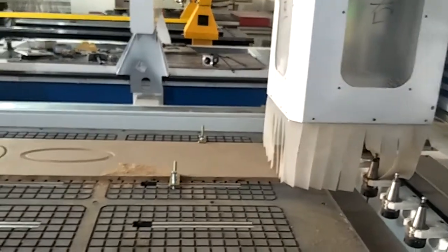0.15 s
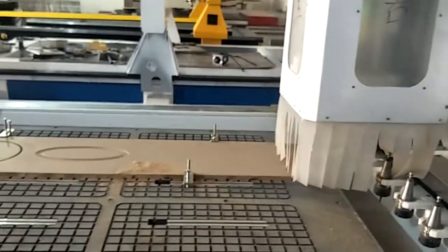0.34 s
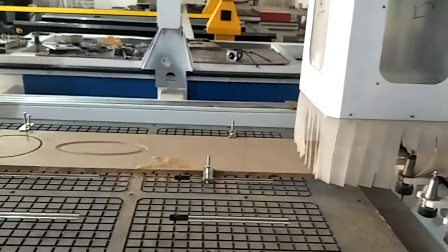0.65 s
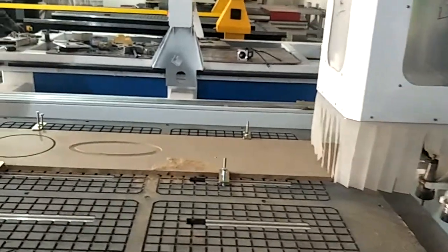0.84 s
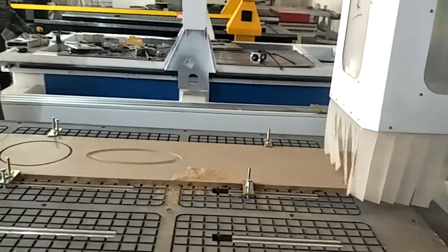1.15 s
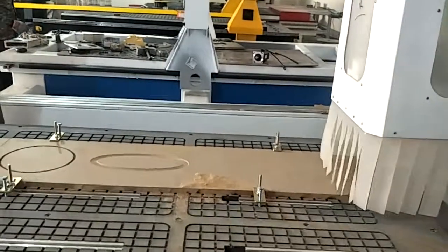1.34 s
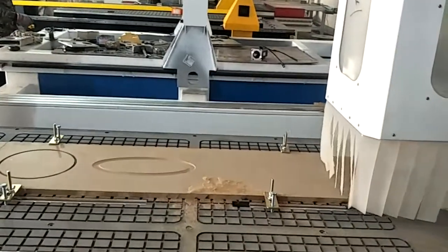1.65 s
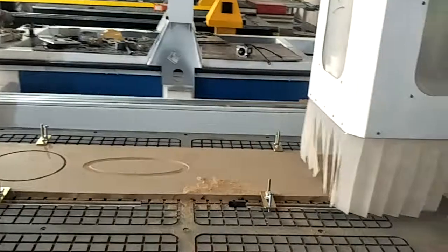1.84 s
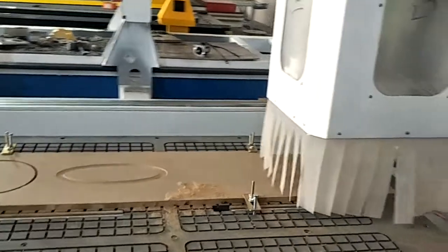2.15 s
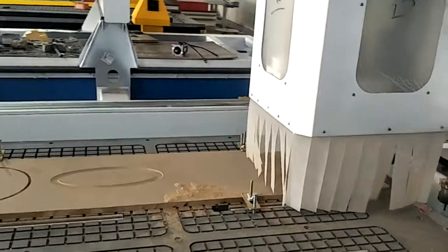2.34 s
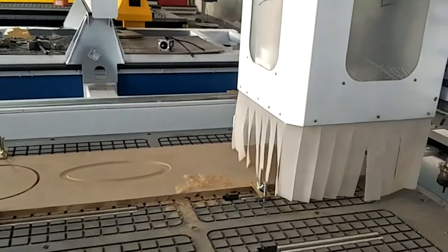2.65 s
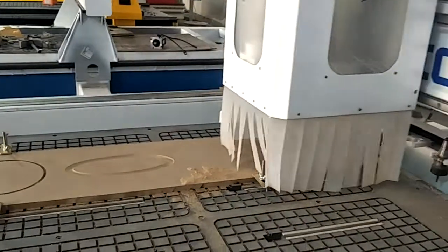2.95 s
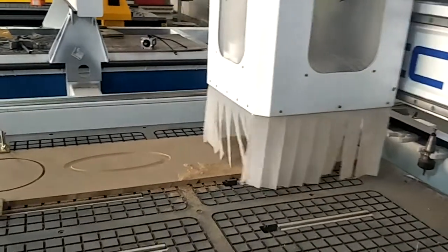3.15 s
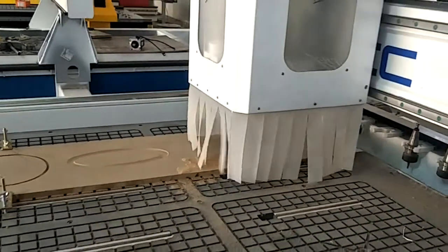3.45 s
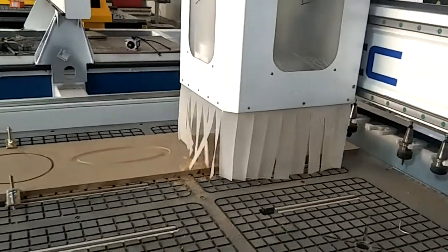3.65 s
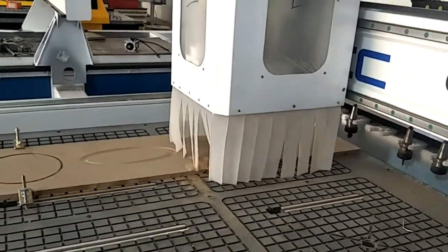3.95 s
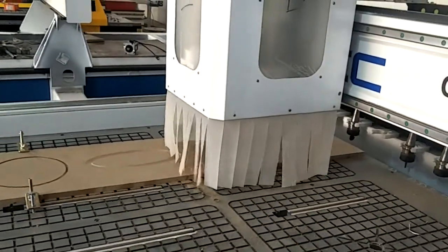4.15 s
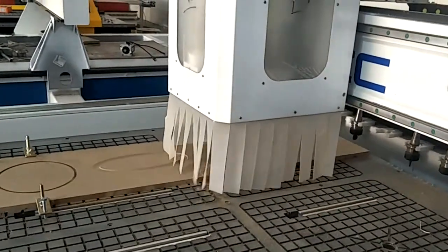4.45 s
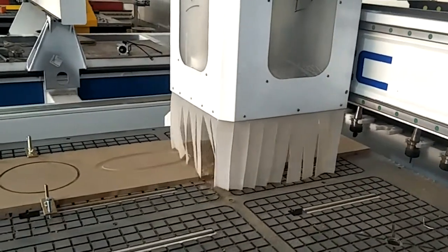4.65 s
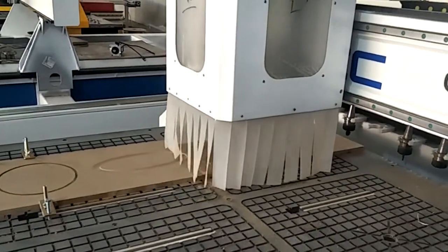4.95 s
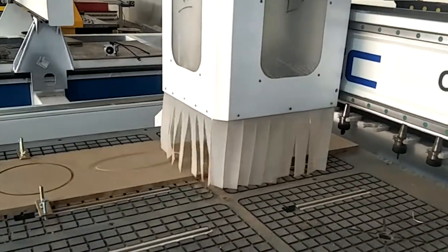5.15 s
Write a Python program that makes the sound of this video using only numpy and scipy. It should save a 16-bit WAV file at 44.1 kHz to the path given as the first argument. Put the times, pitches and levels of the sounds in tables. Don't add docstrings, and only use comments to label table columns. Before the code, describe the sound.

A router spindle runs up in a workshop, low hum and piercing whine climbing together over air rush, with a clanking double knock midway.

```python
import sys
import numpy as np
from scipy import signal
from scipy.fft import rfft, irfft, next_fast_len
from scipy.io import wavfile
from scipy.ndimage import uniform_filter1d, map_coordinates

SR = 44100
rng = np.random.default_rng(int(sys.argv[2]) if len(sys.argv) > 2 else 0)


def persist_wave(psi):
    counts = np.round(np.clip(psi, -1, 1) * 32767).astype(np.int16)
    wavfile.write(sys.argv[1], SR, np.atleast_2d(counts).T)


def magnitude_from_level(level_db):
    exponent = np.asarray(level_db, float) / 20
    return 10 ** exponent


N = 233465
T = np.arange(N) / SR


def unit(x):
    return x / np.sqrt(np.mean(x ** 2) + 1e-20)


def along(points, hz):
    f, v = np.transpose(points)
    return np.interp(np.log(hz + 1), np.log(f + 1), v)


def curves(rows):
    s, *columns = np.transpose(rows)
    return [np.interp(T, s, column) for column in columns]


def wobble(rate):
    return map_coordinates(rng.standard_normal(int(N * rate / SR) + 4), [T * rate])


def gate(start, end, fade):
    return np.clip((T - start) / fade + .5, 0, 1) * np.clip((end - T) / fade + .5, 0, 1)


def since(s):
    return np.maximum(T - s, 0)


def lean(db):
    return db * np.array([[.5], [-.5]])


def tone(hz, flutter_db, rate, turn=0):
    phase = 2 * np.pi * np.cumsum(hz) / SR
    ports = []
    for side in (0, 1):
        level = np.sqrt(2) * magnitude_from_level(flutter_db * wobble(rate))
        ports.append(level * np.sin(phase + side * turn + flutter_db / 4 * wobble(rate)))
    return np.array(ports)


def filtered(x, response):
    m = next_fast_len(N + SR // 2)
    return irfft(rfft(x, m) * response(np.fft.rfftfreq(m, 1 / SR)), m)[..., :N]


def modes(table):
    def response(f):
        total = 0
        for k, (centre, width, db) in enumerate(table):
            total = total + (-1) ** k * magnitude_from_level(db) * 1j * f * width / (centre * centre - f * f + 1j * f * width)
        return total
    return response


def crossing(table, hz):
    power = sum(magnitude_from_level(2 * db) / (1 + (2 * (hz - c) / w) ** 2) ** 2 for c, w, db in table)
    return 10 * np.log10(power)


# t/s, f/Hz
SHAFT_SPEED = [(0.0, 141), (0.25, 150.2), (0.5, 163.2), (0.75, 171.2), (1.0, 181.6), (1.25, 189.7),
               (1.5, 196.7), (1.75, 203.6), (2.0, 209.5), (2.5, 218.8), (3.0, 228.56), (3.5, 238.5),
               (4.0, 249.5), (4.5, 260.5), (5.0, 275.8), (5.29, 282.5)]


def shaft_speed():
    return curves(SHAFT_SPEED)[0]


def ripple_rate():
    set_hz, set_s, ramp_hz_per_s = 1400, 2.52, 232.5
    return set_hz - ramp_hz_per_s * np.maximum(set_s - T, 0)


# f/Hz, width/Hz, level/dB
BED_MODES = [(143.6, 27, -29), (164.5, 7.3, -20), (174.3, 13, -11), (185.2, 9, -10.5), (199.5, 3, -13),
             (207.14, 11.6, -11.5), (225.3, 6.5, -13), (232.2, 10, -20.5), (238.25, 7.4, -17),
             (253.9, 8, -18), (271.1, 10.2, -18), (281.8, 6.5, -22.5)]


def shaft_hum(shaft):
    throb = 2.4 * wobble(11)
    return magnitude_from_level(crossing(BED_MODES, shaft) + throb + lean(1)) * tone(shaft, flutter_db=.5, rate=20)


OVERTONE_LEVELS = [-41, -41, -39.5]
# f/Hz, width/Hz, level/dB
FRAME_MODES = [(347, 22, 4.5), (413, 10.7, 4.5), (536, 82, -0.5), (674.7, 42, 3), (812.6, 29, 4),
               (917.4, 26, 4)]


def frame_rattle(shaft):
    orders = sum(magnitude_from_level(db) * tone(order * shaft, flutter_db=4, rate=22)
                 for order, db in enumerate(OVERTONE_LEVELS, 2))
    return filtered(orders, lambda f: modes(FRAME_MODES)(f) ** 2)


# from t/s, until t/s, gain level/dB
LOAD_CHANGES = [(-.1, .2, 6), (.5, .9, 3), (1.4, 2.6, 3), (2.9, 3.8, -5), (3.85, 4.55, 2)]


def ripple_hum(ripple):
    level_db = -38 + sum(db * gate(start, end, fade=.1) for start, end, db in LOAD_CHANGES)
    return magnitude_from_level(level_db + [[.8], [-1.5]]) * tone(ripple, flutter_db=2.5, rate=9, turn=1.01)


# f/Hz, width/Hz, level/dB
HOUSING_MODES = [(1877, 80, -39.5), (2020, 70, -34), (2123, 39, -27), (2258, 39, -32.5), (2370, 130, -42.5),
                 (2620, 360, -40.5)]


def bearing(shaft):
    pass_hz = 9.3 * shaft
    return magnitude_from_level(crossing(HOUSING_MODES, pass_hz) + 2.0) * tone(pass_hz, flutter_db=0.0, rate=14)


# t/s, level/dB, left-right level/dB
WHINE_LEVELS = [(0, -21.5, -8), (.08, -25.5, 10), (.2, -28, -5), (.35, -22, 9.5), (.7, -25.5, -12),
                (1.1, -26, -5), (1.6, -31.5, -9), (1.8, -30, -5.5), (2.15, -26.5, -15.5), (2.5, -27.5, -12),
                (2.97, -24, -11.5), (3.15, -34.5, -8), (3.6, -31.5, -13.5), (4.0, -26.5, -6.5),
                (4.3, -24, -3.5), (4.65, -23.5, -11), (4.9, -30.5, -2), (5.2, -25, -1.5)]
# f/Hz, level/dB
CASING_RADIATION = [(5300, -33.5), (6200, -31), (6900, -39.5), (7500, -46), (8350, -35.5), (9000, -43.5),
                    (9700, -43), (10300, -38.5)]


def slot_whine(shaft, ripple):
    slot_hz = 32 * shaft
    upper_hz = slot_hz + ripple
    whine_db, lean_db = curves(WHINE_LEVELS)
    runout = sum(magnitude_from_level(-1.5 * order) * wobble(30) * tone(order * shaft, flutter_db=5.5, rate=22)
                 for order in range(1, 6))
    fuzz = np.array([wobble(440) + 0.48 * wobble(2000) for _ in range(2)])
    slots = tone(slot_hz, flutter_db=3.0, rate=20, turn=1.42)
    slots *= 1 + magnitude_from_level(-30.5) * runout + magnitude_from_level(-17) * fuzz
    upper = tone(upper_hz, flutter_db=4.0, rate=24, turn=0.85)
    upper *= 1 + magnitude_from_level(-30) * runout + magnitude_from_level(-17) * wobble(500)
    upper_db = along(CASING_RADIATION, upper_hz) + [[-3.5], [2.5]]
    return magnitude_from_level(whine_db + lean(lean_db)) * slots + magnitude_from_level(upper_db) * upper


# times shaft rate, times ripple rate, plus inverter f/Hz
LINE_PITCHES = [(32, -1, 0), (64, 0, 0), (64, 1, 0), (64, -1, 0), (0, 1.5, 9829), (-32, 1.5, 9829),
                (-32, .5, 18200), (33, 0, 0), (34, 0, 0), (31, 0, 0), (30, 0, 0), (64, 2, 0), (96, 0, 0),
                (96, -1, 0), (96, 1, 0), (58, 0, 0), (0, -1.5, 9829), (-32, 1, 11700), (0, 0, 13600),
                (0, -.5, 14750), (0, 0, 10370), (32, -1, 0)]
# level/dB, left-right level/dB, from t/s, until t/s
LINE_LEVELS = [(-50.5, -9, 0, 6), (-51, -2, 0.3, 6), (-48.5, -1.5, 0, 6), (-53, -1.5, .9, 6),
               (-48, 3.5, 0.52, 6), (-50.5, -3, 1.0, 2.72), (-64, 3.5, 0.25, 1.9), (-56, -12.5, 1.7, 6),
               (-54.5, -3, 0, 2.5), (-53.5, -11, 0.47, 6), (-54, -5.5, 0, 6), (-54, -1, 0.11, .8),
               (-56, -12, 0.075, .4), (-58, 5, 0.16, .5), (-50, 7, 0.19, .2), (-67, -2.5, 0, 1.8),
               (-69, -10, 0, 0.87), (-64, -14, 0.16, 0.29), (-57, -4, 0.8, .75), (-62, 3, 0.99, 1.3),
               (-66.5, 3, 0.078, 1.5), (-41, -1, 1.26, 1.42)]


def weak_lines(shaft, ripple):
    total = np.zeros((2, N))
    for (turns, ripples, base), (db, pan_db, start, end) in zip(LINE_PITCHES, LINE_LEVELS):
        line = tone(turns * shaft + ripples * ripple + base, flutter_db=2.5, rate=30, turn=1.5)
        total += magnitude_from_level(db + lean(pan_db)) * gate(start, end, fade=0.084) * line
    return total


def spindle():
    shaft, ripple = shaft_speed(), ripple_rate()
    low = shaft_hum(shaft) + frame_rattle(shaft) + ripple_hum(ripple) + bearing(shaft)
    high = slot_whine(shaft, ripple) + weak_lines(shaft, ripple)
    return low, high


# f/Hz, correlation
LIKENESS = [(30, 0.98), (150, 0.95), (300, 0.96), (600, 0.87), (1200, 0.2), (2500, 0.0083), (5000, 0.24)]


def rush(spectrum, patchy_db):
    z = signal.stft(rng.standard_normal((2, N)), nperseg=512)[2]
    field = uniform_filter1d(rng.standard_normal(z.shape[1:]), size=5, axis=0)
    field = uniform_filter1d(field, size=12, axis=1)
    pair = signal.istft(z * magnitude_from_level(patchy_db * unit(field)), nperseg=512)[1][:, :N]
    closed = [(0.8, -120)] + list(spectrum) + [(SR / 2, -120)]

    def shares(hz):
        angle = np.arccos(np.clip(along(LIKENESS, hz), -1, 1)) / 2
        return magnitude_from_level(along(closed, hz)) * [np.cos(angle), np.sin(angle)]

    mid, side = filtered(pair, shares)
    return unit(np.array([mid + side, mid - side]))


# f/Hz, level/dB per Hz
RUMBLE_SPECTRUM = [(12, -47.5), (20, -21.5), (54, -18), (97, -5), (151, -0.5), (182, -6.5), (200, -8.5),
                   (260, -18.5), (440, -120)]


def bed_rumble():
    level_db = -35.5 - 7.5 * np.maximum(1.06 - T, 0) + 1.8 * wobble(5)
    return magnitude_from_level(level_db + 3.5) * rush(RUMBLE_SPECTRUM, patchy_db=1.8)


# f/Hz, level/dB per Hz
PANEL_SPECTRUM = [(120, -21.5), (200, 5), (350, 1), (500, -1), (650, -3.5), (780, 4.5), (950, -3),
                  (1300, -6), (1700, -24)]


def panel_noise(work_db):
    return magnitude_from_level(work_db + 1.08 + 0.54 * wobble(8)) * rush(PANEL_SPECTRUM, patchy_db=0.5)


# f/Hz, level/dB per Hz
AIR_SPECTRUM = [(1100, -38.5), (1400, -2), (1700, -6.5), (2100, -1), (2600, -8.5), (3500, -10.5),
                (4500, -14.5), (4750, -37), (5500, -41)]
# f/Hz, level/dB per Hz
THIN_HISS_SPECTRUM = [(4300, -30), (4800, -1), (6200, -6), (7000, -18), (8000, -35), (15500, -36)]


def cooling_air(work_db):
    mean_db = work_db.mean()
    level_db = mean_db - 4 + 0.97 * (work_db - mean_db) + 0.39 * wobble(8)
    tatters = rush(THIN_HISS_SPECTRUM, patchy_db=4.5)
    return magnitude_from_level(level_db + 1.5) * (rush(AIR_SPECTRUM, patchy_db=1.5) + magnitude_from_level(-19.0) * tatters)


# f/Hz, level/dB per Hz
DRAG_SPECTRUM = [(800, -23), (1000, 0.5), (1400, -1), (1900, -10), (2600, -6), (3200, -32)]


def skirt_drag():
    level = magnitude_from_level(-29.5 + 0.84 * wobble(14)) * gate(4.6, 6, fade=0.084)
    return level * rush(DRAG_SPECTRUM, patchy_db=1.5)


# t/s, panel noise level/dB
WORK_LEVELS = [(0, -29), (.12, -33.5), (.6, -30), (.97, -33), (1.65, -29.5), (2.1, -31), (2.6, -29.5),
               (3.1, -26), (3.35, -31.5), (4.0, -31.5), (4.6, -30.5), (5.29, -28.5)]
# t/s, gain level/dB, half length t/s
SKIRT_RUSTLES = [(1.68, 0, .1), (2.916, 2, 0.033), (4.223, 3, 0.082), (4.762, 4.5, 0.07), (5.22, 2, 0.042)]


def shop():
    work_db = curves(WORK_LEVELS)[0]
    for s, db, half in SKIRT_RUSTLES:
        work_db = work_db + db * np.exp(-((T - s) / half) ** 2)
    return bed_rumble() + panel_noise(work_db) + cooling_air(work_db) + skirt_drag()


# t/s, f/Hz, level/dB
SCREW_DRONE = [(.4, 52, -60), (.48, 56, -35), (.6, 62.4, -42), (.75, 71.2, -38), (.95, 79, -47),
               (1.6, 82.1, -43), (2.3, 79.9, -35.5), (2.6, 80, -44)]
# f/Hz, from t/s, until t/s, level/dB
FEED_TONES = [(2005, 1.1, 4.3, -41), (3340, 4.7, 6, -41)]


def feed_motors():
    hz, db = curves(SCREW_DRONE)
    total = magnitude_from_level(db) * gate(0.43, 2.6, fade=.1) * tone(hz, flutter_db=0.5, rate=2.0)
    for hz, start, end, db in FEED_TONES:
        total += magnitude_from_level(db) * gate(start, end, fade=.15) * tone(np.full(N, hz), flutter_db=3.5, rate=32)
    return total


# t/s, peak level/dB, brightness level/dB, t60/s
KNOCK_EVENTS = [(2.887, -16.5, -30, 0.23), (2.956, -28.5, -24, 0.81), (3.03, -12, -6.5, 0.15),
                (3.069, -13, -13.5, .2)]
# f/Hz, width/Hz, level/dB
HOOD_MODES = [(353.7, 38, 2), (576, 6.5, 8.5), (745, 32, -20), (1020, 190, -9)]


def hood_knocks():
    dull, bright = np.zeros((2, N))
    for s, db, bright_db, t60 in KNOCK_EVENTS:
        t = since(s)
        burst = (1 - np.exp(-t / 0.0023)) * magnitude_from_level(db - 60 * t / t60) * rng.standard_normal(N)
        dull += magnitude_from_level(19.5) * burst
        bright += magnitude_from_level(bright_db + 27.5 - 60 * t / 0.091) * burst
    crack = lambda f: magnitude_from_level(-17) * (f > 600) / (1 + (f / 4600) ** 12)
    return filtered(dull, modes(HOOD_MODES)) + filtered(bright, crack)


# f/Hz, level/dB, t60/s
STEEL_PARTIALS = [(2977, -31, .5), (3790, -34, .35), (3900, -23, .14), (3990, -30, .1), (3650, -36, .06)]


def steel_clank():
    t = since(3.028)
    partials = sum(magnitude_from_level(db - 60 * t / t60) * np.sin(2 * np.pi * hz * t) for hz, db, t60 in STEEL_PARTIALS)
    return partials * (1 - np.exp(-t / .002))


def knocks():
    ring = filtered(hood_knocks() + steel_clank(), lambda f: 1 / (1 + (f / 5200) ** 8))
    return np.array([np.roll(ring, -5), ring])


# t/s, f/Hz, peak level/dB
BUMP_EVENTS = [(4.624, 94.7, -16), (4.925, 151, -15), (5.185, 176, -6.5)]


def bumps():
    total = np.zeros(N)
    for s, hz, db in BUMP_EVENTS:
        t = since(s)
        envelope = (1 - np.exp(-t / 0.012)) * magnitude_from_level(db + 3.5 - 60 * t / 0.085)
        total += envelope * np.sin(2 * np.pi * hz * t)
    return total


# f/Hz, t60/s
HALL_DECAY = [(200, 0.34), (2000, 0.61), (6000, 0.43), (12000, 0.14)]


def hall(x):
    hz, t, z = signal.stft(rng.standard_normal((2, SR * 3 // 4)), SR, nperseg=256)
    decay = magnitude_from_level(-60 * t / along(HALL_DECAY, hz)[:, None])
    tail = signal.istft(z * decay, SR, nperseg=256)[1]
    delayed = np.pad(x, ((0, 0), (300, 0)))
    return signal.fftconvolve(delayed, tail / np.linalg.norm(tail[0]), axes=1)[:, :N]


def scene():
    low, high = spindle()
    ring = knocks()
    near = low + magnitude_from_level(-1.0) * high + feed_motors() + ring + bumps()
    echoes = magnitude_from_level(-16.5) * hall(low) + magnitude_from_level(-4.5) * hall(high) + magnitude_from_level(-8) * hall(ring)
    return near + echoes + shop()


def low_pass(x):
    return signal.sosfilt(signal.butter(12, 15810, fs=SR, output="sos"), x)


def record(dry):
    ports = np.array([np.pad(dry[0], (5, 0))[:N], dry[1]])
    ports = ports * np.minimum(T / .006, 1)
    mix = filtered(ports, lambda f: 1 / np.sqrt(1 + (f / 14200) ** 24))
    return low_pass(mix)


dry = scene()
out = record(dry)
persist_wave(out)
```